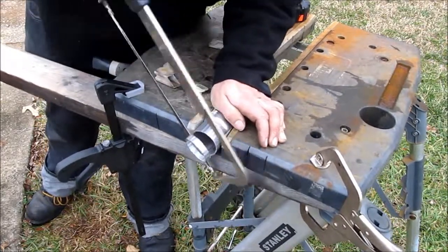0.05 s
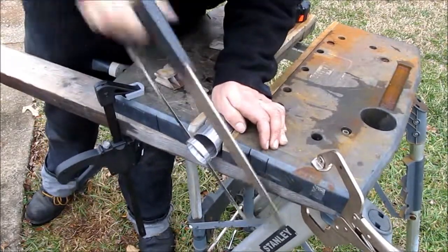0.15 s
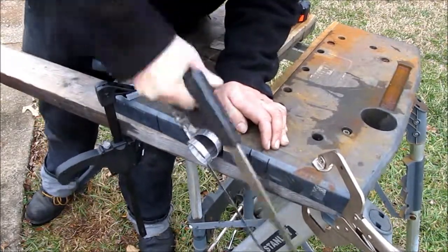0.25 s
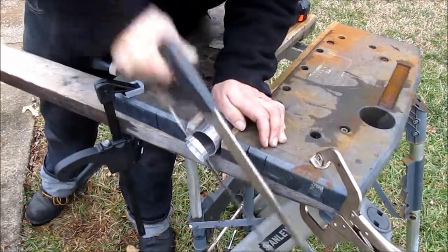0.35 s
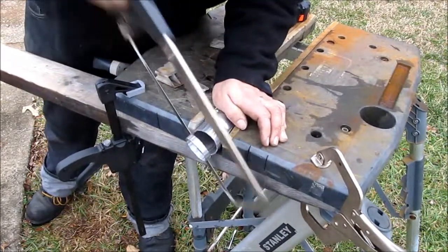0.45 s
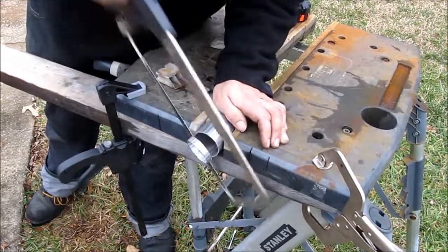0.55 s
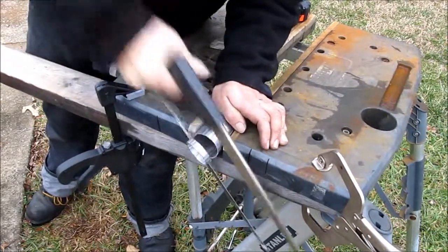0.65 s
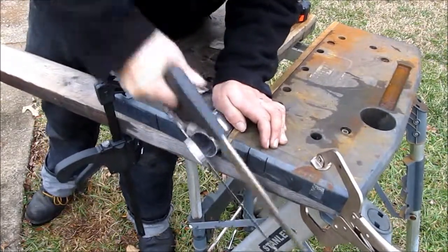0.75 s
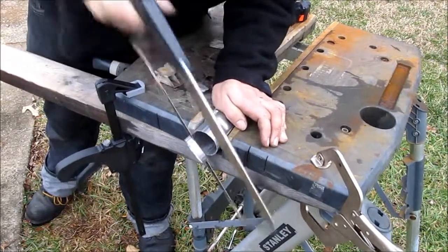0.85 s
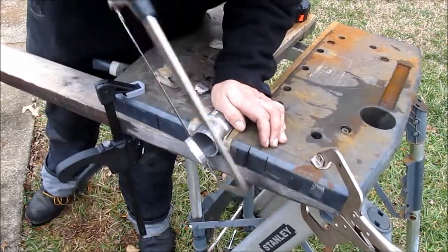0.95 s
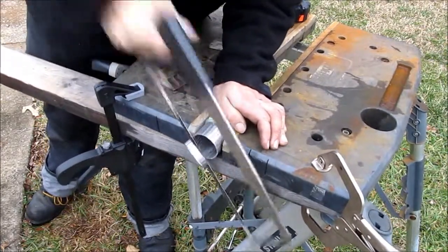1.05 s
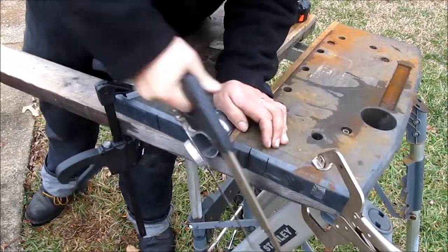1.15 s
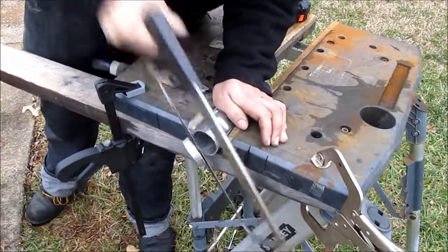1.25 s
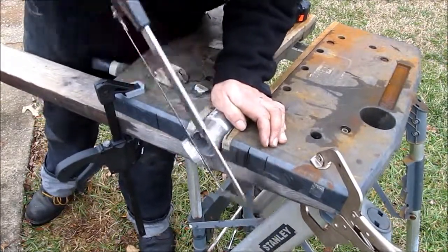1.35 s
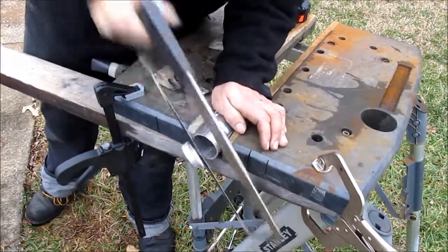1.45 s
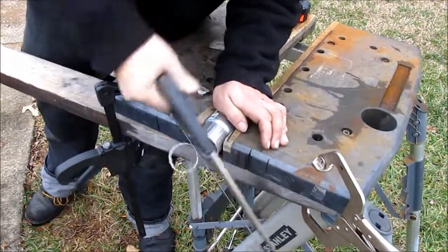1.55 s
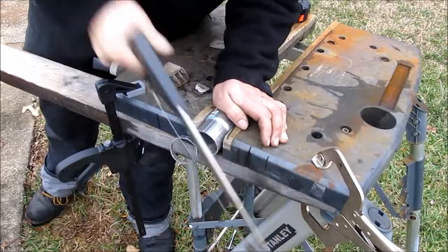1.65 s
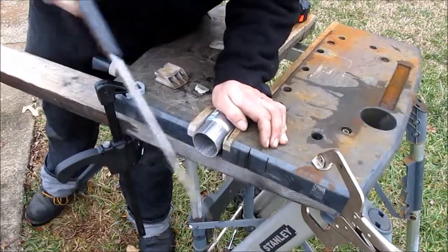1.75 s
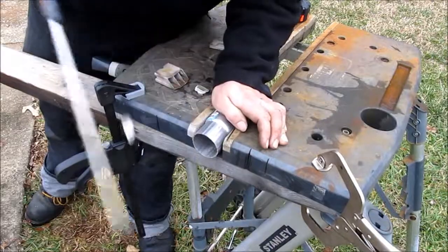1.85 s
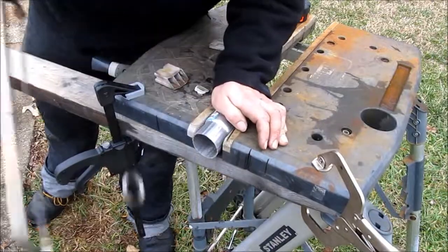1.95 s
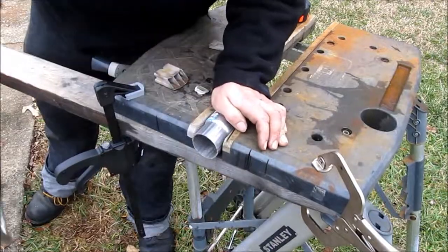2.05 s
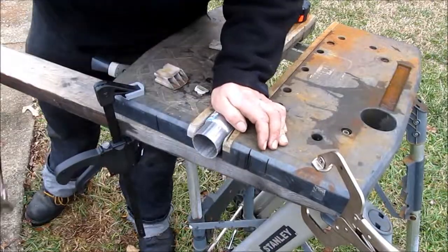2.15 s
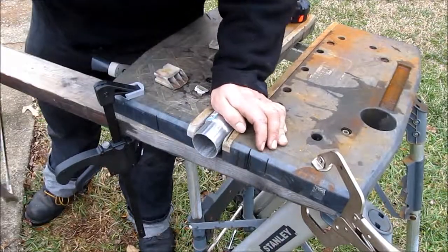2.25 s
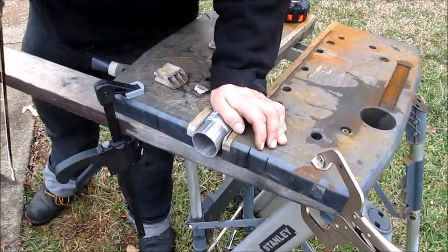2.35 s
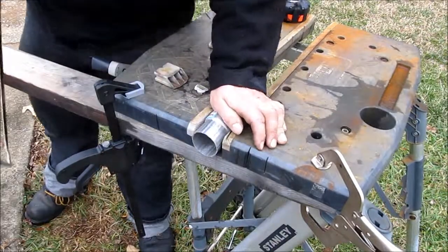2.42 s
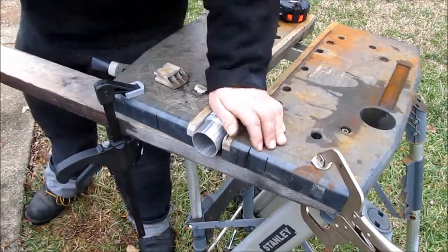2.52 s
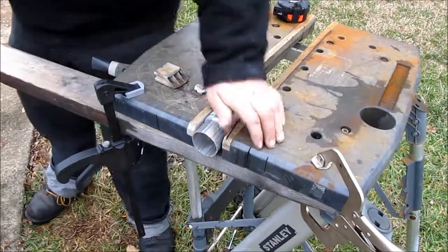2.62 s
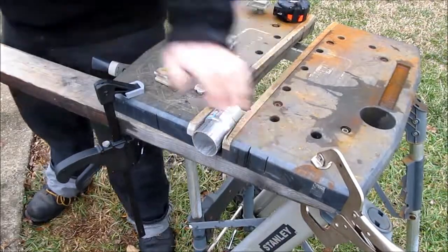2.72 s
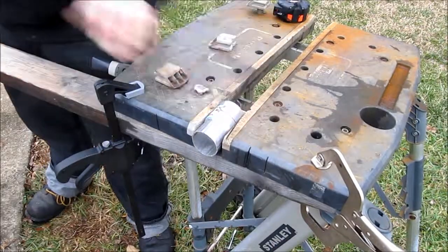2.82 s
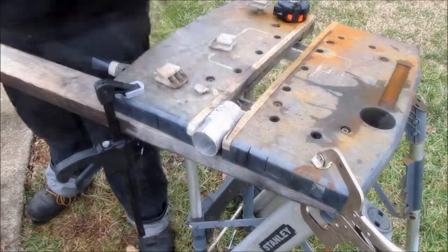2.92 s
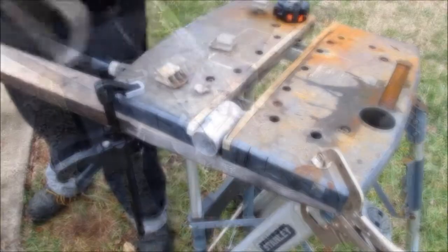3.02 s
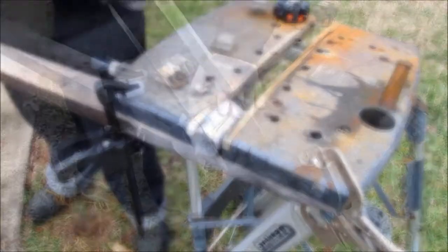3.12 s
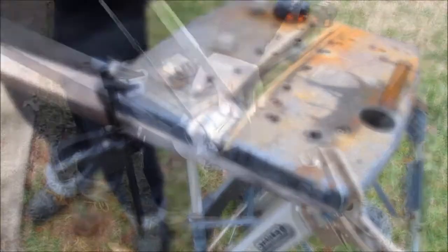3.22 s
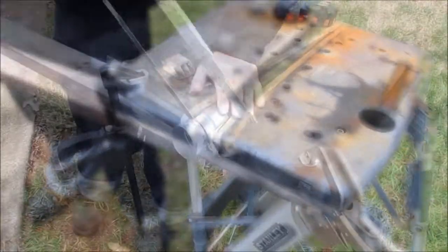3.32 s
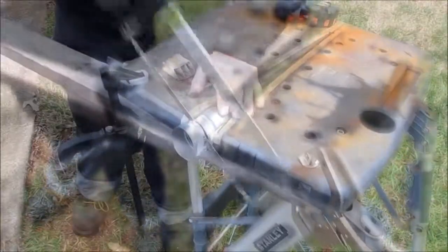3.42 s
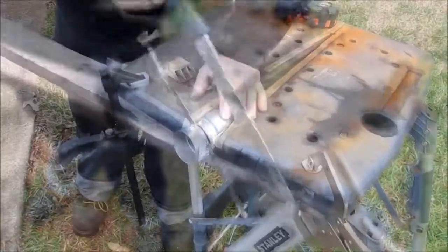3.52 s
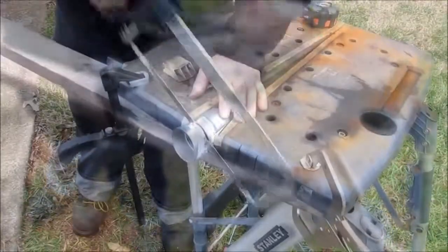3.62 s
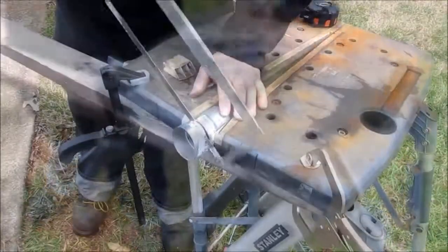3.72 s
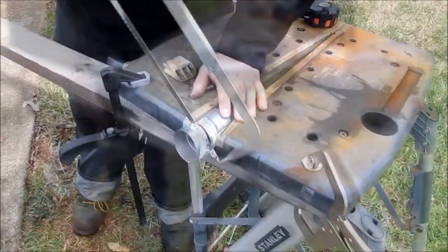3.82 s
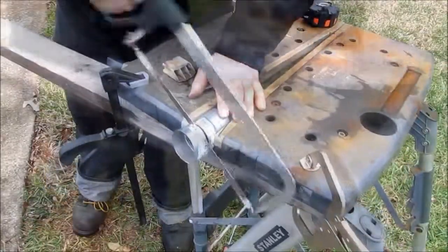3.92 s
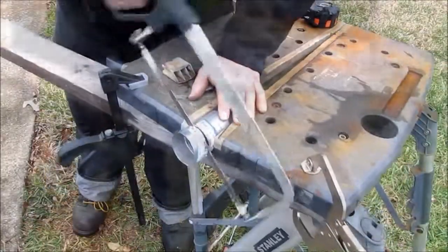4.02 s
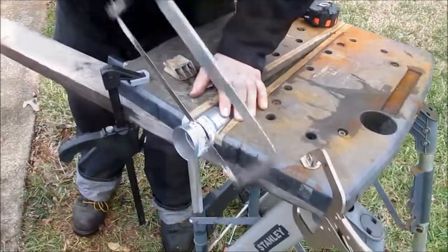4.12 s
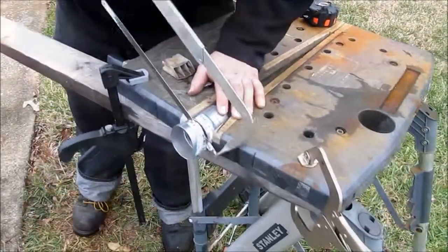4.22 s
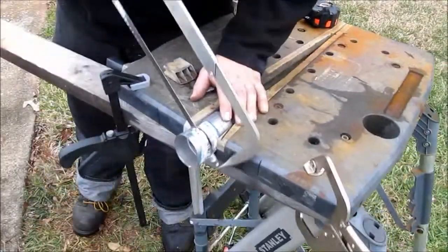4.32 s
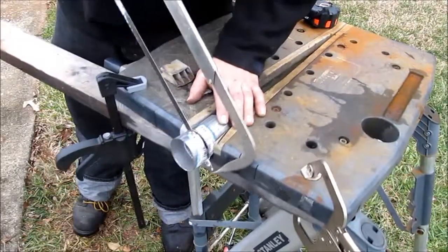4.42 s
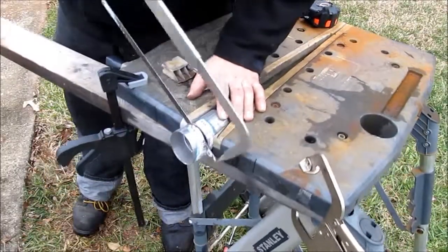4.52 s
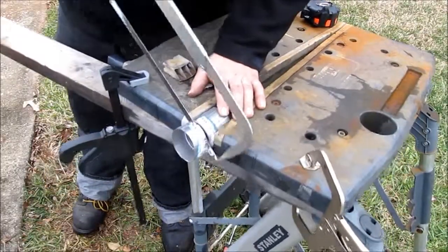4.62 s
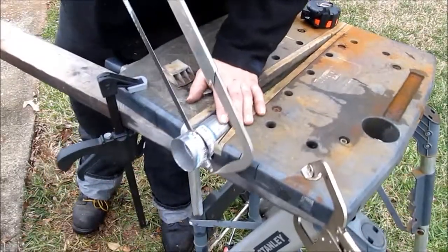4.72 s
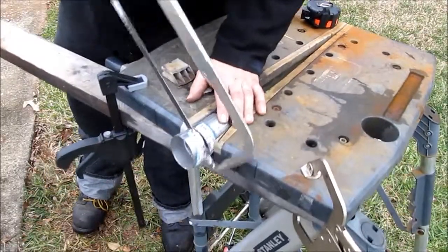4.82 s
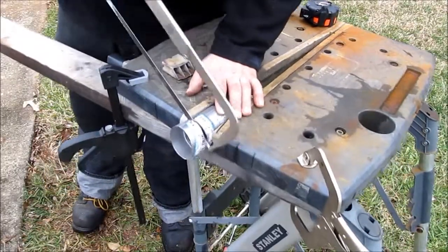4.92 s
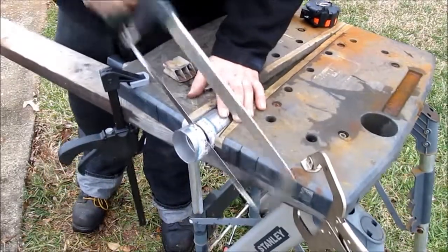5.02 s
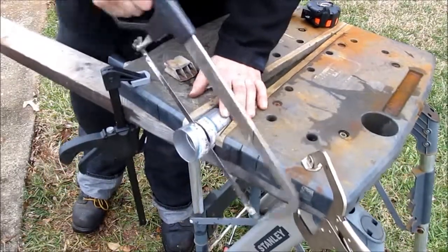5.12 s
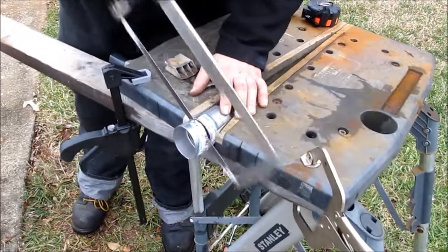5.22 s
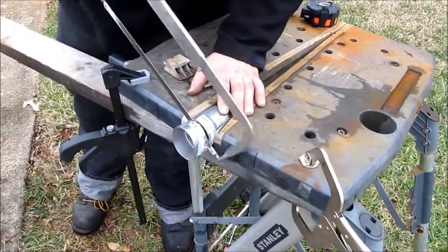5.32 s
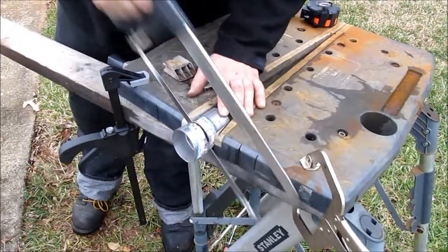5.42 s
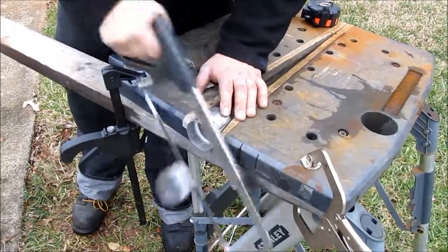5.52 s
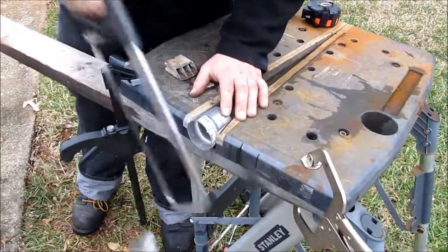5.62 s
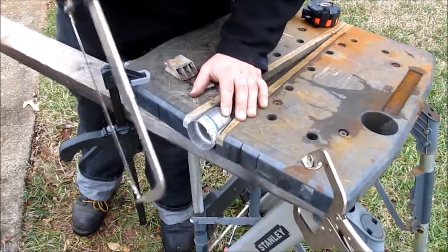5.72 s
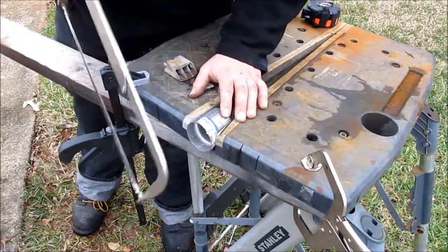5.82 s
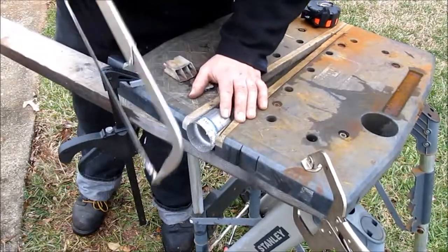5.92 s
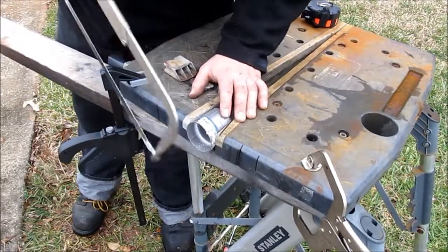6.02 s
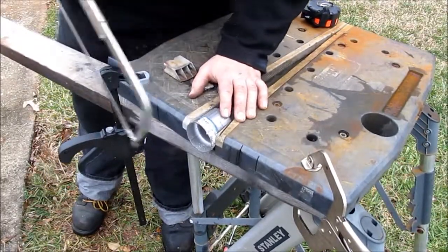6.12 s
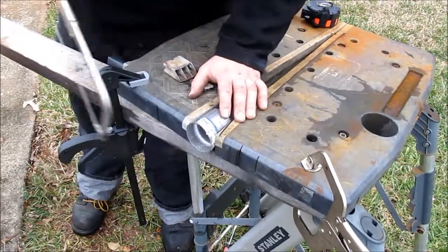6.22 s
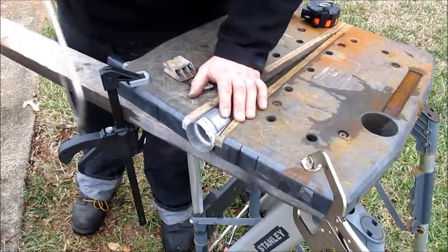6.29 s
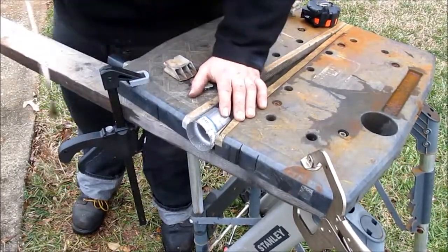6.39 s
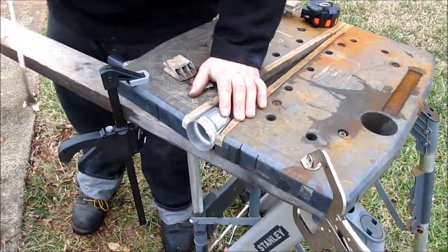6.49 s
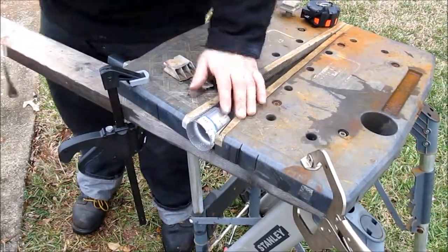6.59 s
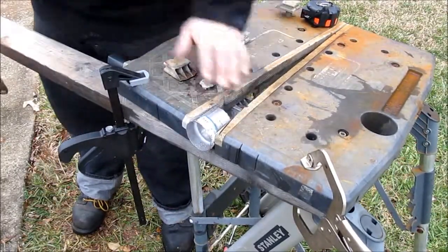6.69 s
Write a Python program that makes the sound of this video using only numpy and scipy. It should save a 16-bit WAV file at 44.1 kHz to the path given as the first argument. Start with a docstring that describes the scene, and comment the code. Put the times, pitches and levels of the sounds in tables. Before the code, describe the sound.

Two bouts of hacksawing on a thin metal pipe, with squeaky chatter and small knocks, over low outdoor rumble and light wind.

```python
"""Outdoors, over a low rumble and wind, a hand hacksaw cuts a thin steel pipe clamped in a folding bench.
In the first cut the teeth hum, flare and rasp, the blade chatters on one note late in a push, and it
snags and knocks; pipe, bench and saw frame ring. Near 1.8 s the loose offcut rings, then cloth rustles
in a pause. From about 3 s comes a second cut, which sounds hollower.
Near 5.6 s the lifted saw rings out, leaving the rumble and wind."""
import sys
import numpy as np
from scipy import signal
from scipy.fft import rfft, irfft, next_fast_len
from scipy.io import wavfile
from scipy.ndimage import uniform_filter1d

SR = 44100
rng = np.random.default_rng(int(sys.argv[2]) if len(sys.argv) > 2 else 0)


def transcribe(signal):
    """Save signal, clipped to [-1, 1], as a 16-bit WAV file at the path in sys.argv[1]."""
    frames = np.atleast_2d(signal).T
    limited = np.clip(frames, -1, 1)
    pcm = np.round(limited * 32767).astype(np.int16)
    wavfile.write(sys.argv[1], SR, pcm)


N = 297675
T = np.arange(N) / SR


def amp(db):
    """Turn decibels into a number to multiply by."""
    return np.exp(np.asarray(db) * np.log(10) / 20)


def rms_one(x):
    """Scale a signal so its average strength (rms) is 1."""
    return x / np.sqrt(np.mean(x ** 2) + 1e-20)


def in_time(rows):
    """Join a table's rows into curves over time."""
    times, *columns = np.transpose(sorted(rows))
    return [np.interp(T, times, column) for column in columns]


def colour(x, points):
    """Shape the tone along (f/Hz, level/dB) points, without ringing ahead of the sound."""
    size = next_fast_len(N + 8192)
    hz, db = np.transpose(points)
    log_hz = np.log(np.linspace(1, SR / 2, size // 2 + 1))
    cepstrum = irfft(np.interp(log_hz, np.log(hz), db) * np.log(10) / 20, size)
    cepstrum[1:size // 2] *= 2   # move all ringing to after its cause
    cepstrum[size // 2 + 1:] = 0
    return irfft(rfft(x, size) * np.exp(rfft(cepstrum)), size)[..., :N]


def drift(hz):
    """A smooth random wobble of size about 1; more Hz makes it quicker."""
    r = np.exp(-32 * np.pi * hz / SR)
    slow = signal.lfilter([1], [1, -2 * r, r * r], rng.standard_normal(N // 16 + 4002))[4000:]
    return np.interp(np.arange(N) / 16, np.arange(len(slow)), rms_one(slow))


def resonance(x, hz, width):
    """Ring at one pitch; a narrower width rings longer."""
    r = np.exp(-np.pi * width / SR)
    feedback = [1, -2 * r * np.cos(2 * np.pi * hz / SR), r * r]
    return signal.lfilter([(1 - r * r) / 2, 0, (r * r - 1) / 2], feedback, x + 1e-18)


def modes(force, rows, shift_db, reclamp_s=2.5):
    """An object's own notes; the moving contact favours now one, now another. Reclamping resets the mix."""
    out = 0
    for k, (hz, width, first_db, second_db) in enumerate(rows):
        db = np.where(T < reclamp_s, first_db, second_db) + shift_db * drift(23)
        out += (-1) ** k * resonance(force * amp(db), hz, width)
    return out


# Low outdoor rumble and yard reverberation, louder during the sawing, and wind:
# t/s, rumble level/dB, wind level/dB
BACKGROUND = [(0.0, -46, -60.5), (1.6, -58, -60.5), (2.8, -55.5, -57), (2.86, -49.5, -45),
              (3.3, -41.5, -50), (3.9, -53, -56.5), (4.3, -55, -62), (4.7, -52.5, -52.5), (5.2, -47.5, -69),
              (5.8, -60.5, -63.5), (6.75, -58, -63.5)]
# The tone of the rumble and of the wind: f/Hz, level/dB
RUMBLE_TONE = [(88, -55.5), (150, -7.5), (179, -15), (414, -11.5), (475, -9.5), (821, -8.5), (998, -7),
               (1760, -14), (3300, -24.5), (3800, -21), (4400, -28.5), (8000, -38.5), (12000, -48.5),
               (15000, -64)]
WIND_TONE = [(12, -32.5), (20, -19.5), (81, 4), (173, 2), (211, -2.5), (348, -28), (400, -40.5),
             (520, -49.5), (880, -120)]
# Cloth rustles: t/s, half length/s, f/Hz, level/dB
CLOTH = [(2.425,.018,5000,-65),(2.645,.012,6000,-68),(2.59,.025,600,-58),(2.99,.012,8000,-60),(6.6,.3,6000,-82)]
def air(wind_apart=.55, hiss_db=-78):
    """Outdoor rumble, wind on the microphone (a bit different each side), cloth and faint hiss."""
    rumble_db, wind_db = in_time(BACKGROUND)
    a, b, c, d = rng.standard_normal((4, N))
    rumble = rms_one(colour(np.array([a + 0.33 * b, a - 0.23 * b]), RUMBLE_TONE))
    rumble *= amp(rumble_db - 2.5 + 2.2 * drift(1.3))
    wind = rms_one(colour(np.array([c + wind_apart * d, c - wind_apart * d]), WIND_TONE))
    wind *= amp(wind_db + 2 * drift(8.4) + [[-1.2], [1.2]])
    rustle = sum(amp(db) * np.exp(-((T - s) / length) ** 2) * rms_one(resonance(b, hz, 1.1 * hz))
                 for s, length, hz, db in CLOTH)
    hiss = amp(hiss_db) * resonance(rng.standard_normal((2, N)), 10000, 5000)
    return rumble + wind + rustle + hiss


# The idle blade drags in the slot: t/s, rasp level/dB
IDLE_DRAG = [(2.82, -98), (2.84, -63.5), (3.08, -54.5), (4.2, -55), (4.4, -75.5), (4.7, -59.5),
             (5.6, -59.5), (5.8, -80.5)]
# Saw strokes: bite t/s, length/s, first and last rasp level/dB, rise and fall/(dB per s),
# bench over rasp/dB, share spent speeding up, top and last tooth rate/Hz,
# hum level/dB speeding up and slowing down, frame ring level/dB
SAW_STROKES = [ (0.02, .012, -23, -25.5, 402, 554.5, 4, .5, 750, 700, -43, -64, -41),
               (0.099, 0.13, -31, -28, 217.5, 619, 7, .4, 1140, 520, -39.5, -29.5, -32),
               (0.335, 0.15, -31.5, -33, 898, 600, 11.5, .55, 943, 700, -33, -32, -55),
               (0.57, 0.095, -29, -30.5, 345.5, 473, 7.5, 0.203, 1235, 520, -27, -31.5, -37),
               (0.782, 0.14, -29.5, -30.5, 588.5, 501, 8.5, .45, 983, 580, -41.5, -30, -31),
               (0.991, 0.11, -29.5, -28, 351, 520, 4.5, 0.2986, 1110, 600, -28, -33, -36),
               (1.198, 0.13, -30, -32, 1002, 348, 9, .45, 980, 655, -33, -46, -51),
               (1.416, 0.13, -31, -31.5, 355, 500, 6.5, 0.249, 1050, 560, -31, -32.5, -30),
               (1.622, 0.058, -27, -27.5, 398.5, 377.5, -9, .3, 813, 646, -27, -31, -31),
               (3.092, 0.069, -29, -26, 1995.5, 328.5, 11, .5, 750, 800, -49, -37, -58),
               (3.362, 0.09, -23, -24, 397, 420.5, 4.5, .75, 994, 1000, -24.5, -25.5, -33),
               (3.617, 0.098, -27, -25.5, 797, 374, 5, 0.39, 654, 655, -45, -27, -36),
               (3.865, .055, -23.5, -24.5, 710, 321, 3.5, .7, 1060, 920, -42.5, -16, -29),
               (4.025, 0.026, -42.5, -46.5, 499.5, 449, 22.5, .5, 840, 700, -55, -65, -37),
               (4.102, 0.08, -28, -28.5, 600, 427.5, 6, .5, 720, 760, -66, -48, -57.5),
               (4.271, .01, -42, -44, 2496, 500.5, 14, .5, 750, 700, -58, -58, -68.5),
               (4.506, .018, -56, -45.5, 1998.5, 700.5, 15, 0.59, 750, 700, -51.5, -62, -73),
               (4.623, .012, -34.5, -40, 2500, 420.5, 16.5, 0.32, 716, 700, -63, -53, -51.5),
               (4.853, 0.03216, -29, -26, 2501, 450, 10.5, .9, 850, 637, -33.5, -24.5, -56),
               (4.961, 0.09, -24, -25.5, 1496, 514, -3, .65, 1090, 860, -28.5, -19, -36.5),
               (5.20, 0.076, -27, -29, 490, 272, 2.5, 0.37, 850, 800, -44.5, -36.5, -57),
               (5.377, 0.08, -23.5, -24, 496, 550, -6, .6, 1110, 880, -28, -26.5, -42),
               (5.626, 0.012, -27, -31.5, 1992, 700.5, -3, .5, 1200, 700, -51, -60, -39), ]
def strokes(bite_hz=660, run_up_s=.025, brake_db_per_s2=1198):
    """Each stroke swells, holds and fades as the blade speeds up, then slows. The louder stroke wins."""
    bench_rise, bench_fall, hum_follows = 0.54, 0.44, 0.96   # shares of the rasp's rise and fall
    t = T[::32]
    rasp_db = np.interp(t, *np.transpose(IDLE_DRAG))
    bench_db = rasp_db + 13.5
    hum_db, tooth_hz = np.full(len(t), -120.), np.full(len(t), float(bite_hz))
    for s, length, bite_db, end_db, rise, fall, load_db, share, top, last, up_db, down_db, _ in SAW_STROKES:
        held_db = np.interp(t, [s, s + length], [bite_db, end_db])
        early, late = np.maximum(s - t, 0), np.maximum(t - s - length, 0)
        lost_db = rise * early + fall * late + brake_db_per_s2 * (early + late) ** 2
        turns = [s - run_up_s, s + np.clip(share, 0, 1) * length, s + length + 1 / SR]
        held_hum_db = np.interp(t, turns, [up_db, (up_db + down_db) / 2, down_db])
        bench_follows = np.where(t < s, bench_rise, bench_fall)
        wins = held_db - lost_db > rasp_db
        rasp_db = np.where(wins, held_db - lost_db, rasp_db)
        bench_db = np.where(wins, held_db + load_db - bench_follows * lost_db, bench_db)
        hum_db = np.where(wins, held_hum_db - hum_follows * lost_db, hum_db)
        tooth_hz = np.where(wins, np.interp(t, turns, [bite_hz, top, last]), tooth_hz)
    smoothed = uniform_filter1d(np.array([bench_db, hum_db, tooth_hz]), size=9)
    return [np.interp(T, t, curve) for curve in (rasp_db, *smoothed)]


def tooth_hum(phase, hum_db, flicker_db=4.5):
    """Passing teeth hum; the hum flares as its pitch sweeps through the bench's notes."""
    wave = np.sin(phase) + amp(-13.5) * np.sin(2 * phase) + amp(-12) * np.sin(3 * phase)
    hum = amp(hum_db + flicker_db * drift(71)) * wave
    return amp(-4) * hum + amp(4) * bench(hum, shift_db=3)


def chips(phase, bunching=0.6, spread_db=3.5):
    """Chips tear off in grains of uneven size, bunched on each passing tooth."""
    sizes = amp(spread_db * np.minimum(rng.exponential(1, N), 4) + 2.16 * drift(58))
    return rms_one(rng.standard_normal(N) * sizes * (1 + bunching * np.cos(phase)))


# The bench's notes: f/Hz, width/Hz, first cut level/dB, second cut level/dB
BENCH_NOTES = [(293.7,11,4,4),(456.5,41,-4,-2),(724,68,-3.5,1),(849,50,3,2),(1128.5,83,-5.5,1),(1136,66,-9,-4),(1343,20,-6,-6),(1583,53,0.5,2),(1920,98,-16,-20.5)]
def bench(force, shift_db):
    """Shaken wood and hinges give broad, short rings."""
    return modes(force, BENCH_NOTES, shift_db)


def blade(force, count=30, width_hz=45):
    """The thin blade has many close, short notes; each flares and fades as its free length changes."""
    pitches = np.linspace(2800, 15000, count) + rng.uniform(-110, 110, count)
    return modes(force, [(hz, width_hz, 0, 0) for hz in pitches], shift_db=6)


# The pipe's notes: f/Hz, time to fade by 60 dB/s, first cut level/dB, second cut level/dB
PIPE_NOTES = [(2235,0.25,5.5,1),(2636,0.18,4.5,6),(3223,0.1,1,-12.5),(3158,0.09,-26,5.5),(3954,0.016,-7.5,-1.5),(4600,0.025,-28,-27.5),(5000,.1,-33,-13),(5470,0.059,-22,-20),(5890,0.044,-6,-27.5),(6370,0.088,-18,-15),(7400,0.089,-22,-22),(8450,0.0073,-6,-17.5),(7980,0.06,-24,-25.5),(10740,0.0042,-20.5,-22),(12500,.008,-12.5,-12)]
def pipe(force, shift_db):
    """The shaken steel pipe gives thin, high rings."""
    rows = [(hz, np.log(1000) / np.pi / fade_s, *levels) for hz, fade_s, *levels in PIPE_NOTES]
    return modes(force, rows, shift_db)


# How strongly the hollow notes sound: t/s, level/dB
HOLLOW_STRENGTH = [(0,-15),(3,7),(4.3,3),(4.9,5.5),(6.75,-9)]
# The hollow notes: f/Hz, width/Hz, level/dB
HOLLOW_NOTES = [(1562,60,17),(1092,27,12.5),(289,42,-2.5)]
def hollow_pipe(grains, rasp_db):
    """The rasp wakes the pipe's hollow notes; the second cut sounds hollower."""
    strength_db, = in_time(HOLLOW_STRENGTH)
    force = grains * amp(rasp_db + strength_db)
    return sum(amp(db) * resonance(force, hz, width) for hz, width, db in HOLLOW_NOTES)


# The tone of the rasp: f/Hz, level/dB
RASP_TONE = [(150,-59.5),(300,-10.5),(700,-11),(1500,-9),(3000,-12.5),(6000,-16.5),(9000,-16.5),(12000,-21.5),(15200,-29),(16400,-57.5)]
# How wide the saw sounds between the ears: f/Hz, side level/dB
STEREO_WIDTH = [(60, -3.5), (180, -51.5), (550, -28.5), (1650, -8.5), (4970, -7.5), (15000, -6)]
def saw():
    """Teeth hum and rasp through the steel and set blade, bench and pipe ringing."""
    rasp_db, bench_db, hum_db, tooth_hz = strokes()
    phase = 2 * np.pi * np.cumsum(tooth_hz * (1 + 0.025 * drift(90))) / SR   # unevenly spaced teeth
    hum = tooth_hum(phase, hum_db)
    grains = np.array([chips(phase) for _ in range(2)])
    treble = signal.sosfilt(signal.butter(2, 2700, "high", fs=SR, output="sos"), colour(grains[0], RASP_TONE))
    scrape = grains * amp(rasp_db - 4) / np.std(treble)   # the treble sets the rasp's level
    rasp = colour(amp(-1.5) * scrape + amp(-4) * blade(scrape), RASP_TONE)
    bench_ring = amp(4.5) * bench(grains * amp(bench_db), shift_db=4)
    pipe_ring = amp(8.5) * pipe(grains * amp(rasp_db), shift_db=3.5)
    body = hum + hollow_pipe(grains[0], rasp_db)
    mid, side = rasp + bench_ring + pipe_ring   # both ears share mid; side sets them apart
    mid = mid + body
    side = colour(side + amp(-10.5) * body, STEREO_WIDTH)
    tilt = colour(mid, [(2000, -35.5), (5000, -14), (12000, -19)])   # the treble leans left
    return mid + (side + tilt) * [[1], [-1]]


# Bursts of blade chatter: t/s, length/s, f/Hz, level/dB
CHATTER_BURSTS = [(.016,.03,553,-27),(.222,.025,562,-21),(.486,.012,560,-36),(.66,.03,553,-21),(.922,.022,555,-28),(1.1,.03,556,-20),(1.345,.012,560,-40),(1.522,.035,562,-20)]
# The tones in each burst: multiple of the pitch, level/dB
CHATTER_TONES = [(1,3.5),(2,7.5),(3,6.5),(4,-3),(5,-1)]
def chatter():
    """The blade sticks and slips on one note; its lowest tone swells first, higher ones die sooner."""
    out = np.zeros(N)
    waver, rough = drift(60), np.clip(drift(90), -2, 1.5)
    for s, length, hz, db in CHATTER_BURSTS:
        near = slice(max(round((s - .05) * SR), 0), round((s + .3) * SR))
        phase = 2 * np.pi * np.cumsum(hz * (1 + 0.008 * waver[near])) / SR
        release_db = 520 * np.maximum(T[near] - s - length, 0)
        for k, tone_db in CHATTER_TONES:
            t = T[near] - s + 0.021 / k
            grip = np.clip(t / 0.017, 0, 1) * amp(-190 * k * np.maximum(t, 0) - release_db)
            out[near] += amp(db + tone_db + 4.2 * rough[near]) * grip * np.sin(k * phase + 1.3 * k * k)
    return out


# The saw frame's notes: f/Hz, level/dB, time to fade by 60 dB/s
FRAME_NOTES = [(2245,-0.5,0.32),(3210,-14.5,0.34)]
# Single ringing notes, as one late stroke lets go, from the loose offcut and from the lifted saw: t/s, f/Hz,
# level/dB, time to fade by 60 dB/s
SINGLE_NOTES = [(1.791,3736,-54,0.27),(5.062,2575,-31,0.13),(5.578,3143,-52,.4),(5.628,2570,-32.5,0.15),(5.65,2245,-51.5,0.95),(5.66,770,-62.5,3)]
def free_rings():
    """The frame rings freely as each stroke lets go; one late stroke, the offcut and the lifted saw leave
    single notes."""
    out = np.zeros(N + SR)
    notes = [(s + length, hz, ring_db + db, fade_s)
             for s, length, *_, ring_db in SAW_STROKES for hz, db, fade_s in FRAME_NOTES]
    for s, hz, db, fade_s in notes + list(SINGLE_NOTES):
        t, i = T[:min(round(fade_s * SR), SR)], round(s * SR)
        loudness = amp(db - 60 * t / fade_s) * np.clip(t / 0.0036, 0, 1)
        out[i:i + len(t)] += loudness * np.sin(2 * np.pi * hz * t)
    return out[:N]


# Knocks, snags and brief flares of the tooth hum: t/s, level/dB, tone f/Hz, crack over tone/dB
KNOCKS_AND_FLARES = [(0.171, -7, 846, -5.5), (0.344, -16, 697, -3), (0.679, -12, 570, -4),
                     (0.779, -13.5, 705, -14.5), (0.987, -19.5, 890, 7), (1.204, -12.5, 670, -26.5),
                     (1.255, -13.5, 910, 2), (1.468, -6, 821, -9), (1.522, -11, 1125, 3.5),
                     (1.634, -14.5, 722.3, 3), (1.686, -34.5, 660, 10), (1.715, -29, 920, 10),
                     (1.784, -30, 796, 18), (2.19, -39.5, 417, 0.5), (2.567, -35.5, 809, -15),
                     (3.096, -13.5, 715, -5), (3.204, -6.5, 743, -1), (3.34, -17, 764, -2.5),
                     (3.614, -22, 1140, -12), (3.768, -16.5, 1119, 13.5), (3.829, -26.5, 610.2, 10),
                     (3.868, -3, 892, -1), (3.951, -7.5, 312, 7.5), (4.029, -20.5, 280, -2),
                     (4.078, -25, 702.3, -2), (4.196, -8.5, 711.3, -3.5), (4.275, -23, 800.6, -6),
                     (4.365, -33.5, 316.5, -2.5), (4.389, -37, 324, -2), (4.423, -26.5, 325, -1),
                     (4.525, -24.5, 814, -5), (4.627, -23, 291.2, 4.5), (4.68, -35.5, 430, -8.5),
                     (4.734, -26.5, 303.5, -7), (4.783, -22.5, 335, -1.5), (4.856, -27, 760, 9),
                     (4.889, -17, 790, -5), (4.965, -27.5, 1060, 18), (5.069, -23, 288, 5),
                     (5.149, -31.5, 800, -0.5), (5.455, -16, 282.7, 8.5), (5.476, -30, 610, 12),
                     (5.532, -17, 290.3, 6.5), (5.579, -38, 725, 6), (5.621, -30.5, 700, 8),
                     (5.814, -38, 423, -3.5)]
def knocks_and_flares(crack_rise_s=.001):
    """Each is a short tone, a crack of noise and a bright snap that set bench and pipe ringing."""
    out, noise = np.zeros((2, N)), rng.standard_normal((2, N))
    noise = noise[0] + .35 * noise[1] * [[1], [-1]]
    for s, db, hz, crack_db in KNOCKS_AND_FLARES:
        i = round(s * SR)
        t = T[:min(N - i, 9000)]
        tone = np.sin(2 * np.pi * hz * t) * np.clip(t / 0.00098, 0, 1) * amp(-1600 * t)
        crack_shape = np.clip(t / crack_rise_s, 0, 1) * (amp(-2200 * t) + amp(-17 - 480 * t))
        crack = amp(crack_db) * noise[:, i:i + len(t)] * crack_shape
        snap = amp(crack_db + 2 - 18000 * t) * np.diff(noise[:, i - 1:i + len(t)])
        out[:, i:i + len(t)] += amp(db) * (tone + crack + snap)
    out = colour(out, [(80, -42), (280, -5.5), (3000, -4.5), (9000, -20.5), (16000, -32.5)])
    return out + bench(out, shift_db=2) + amp(-8) * pipe(out, shift_db=3)


def echoes(x):
    """Ground and walls send back a few dull echoes, other ones to each ear."""
    out = np.zeros((2, N))
    delays_s = np.array([.006, .008, .015, .019, .029, .037, .052, .061])
    for k, lag in enumerate((delays_s * SR).astype(int)):
        out[k % 2, lag:] += x[k % 2, :-lag] * amp(-22 - 200 * lag / SR)
    return signal.lfilter([.4], [1, -.6], out)


def scene():
    """The sawing, its echoes and the background, for left and right ear."""
    work = saw() + chatter() + free_rings() + knocks_and_flares()
    return work + echoes(work) + air()


def record(dry):
    """Round off the loudest peaks and cut the highest treble."""
    treble_cut = signal.cheby2(12, 70, 16600, fs=SR, output="sos")
    return signal.sosfilt(treble_cut, .8 * np.tanh(dry / .8))


dry = scene()
out = record(dry)
transcribe(out)
```